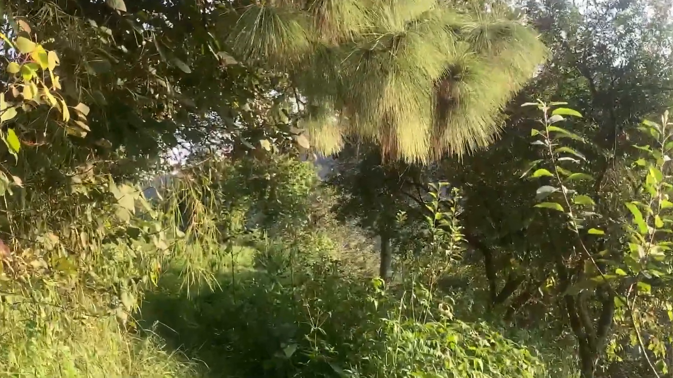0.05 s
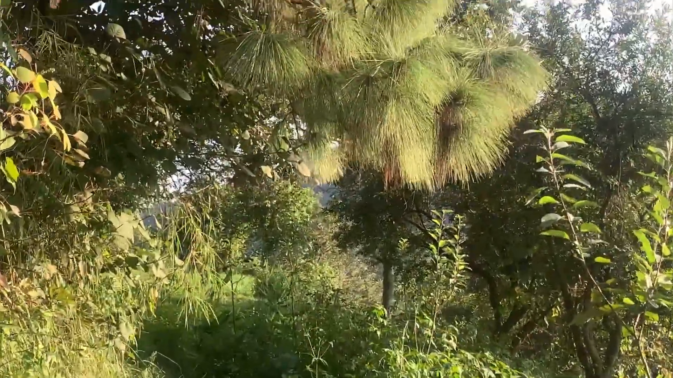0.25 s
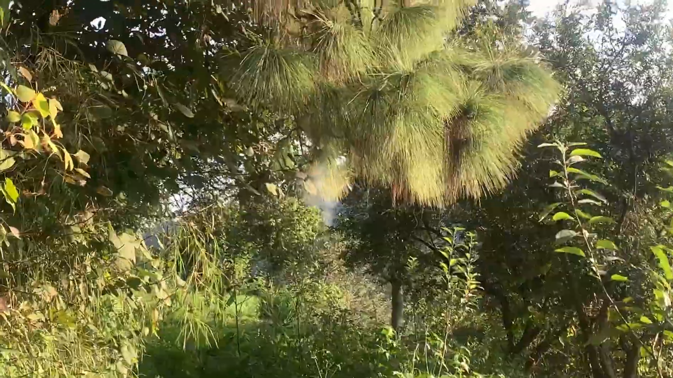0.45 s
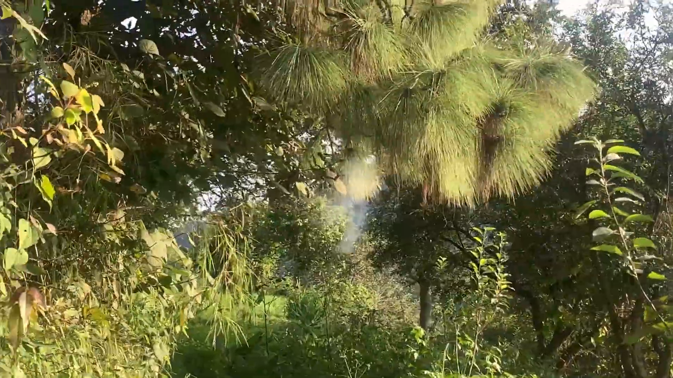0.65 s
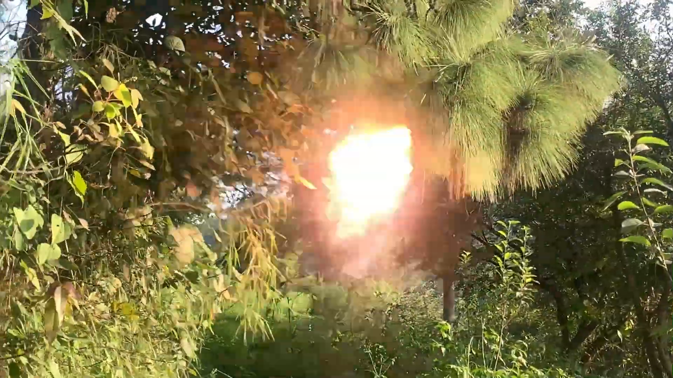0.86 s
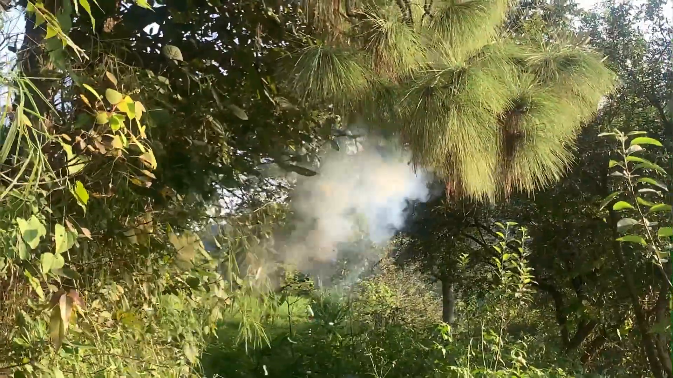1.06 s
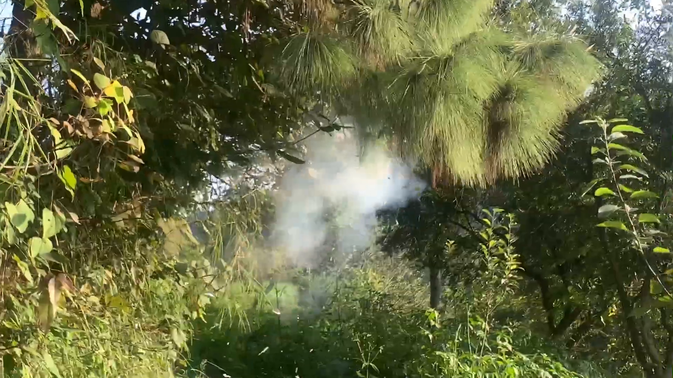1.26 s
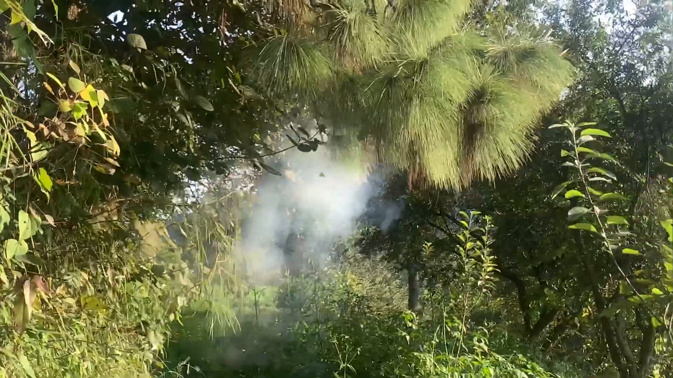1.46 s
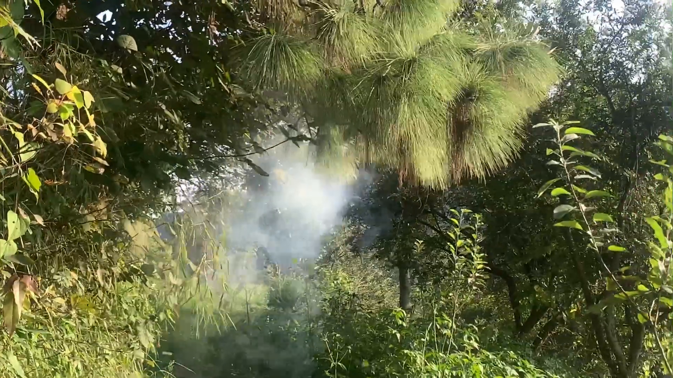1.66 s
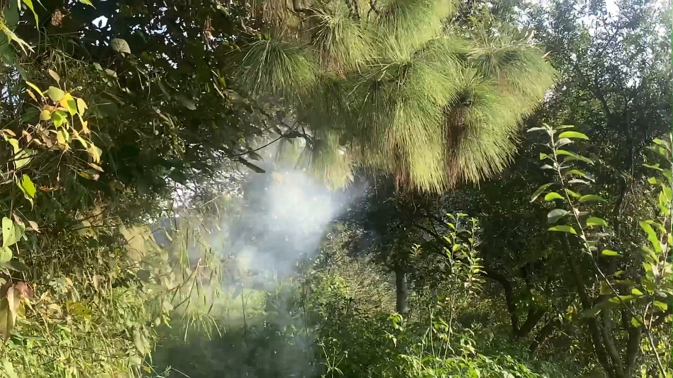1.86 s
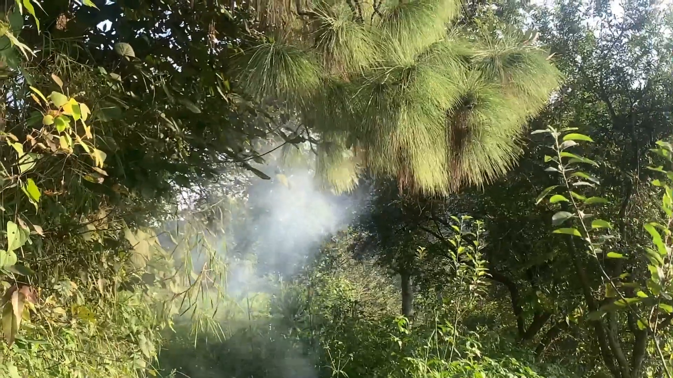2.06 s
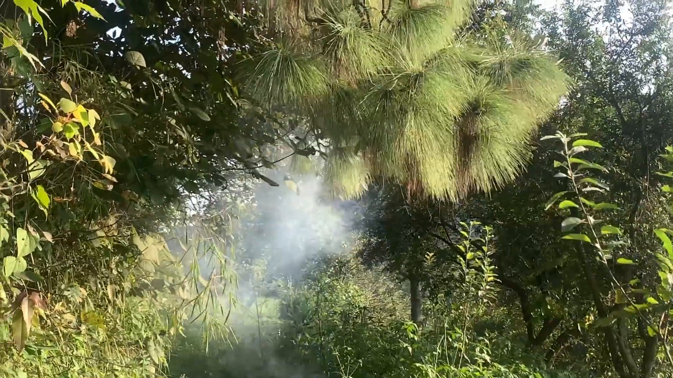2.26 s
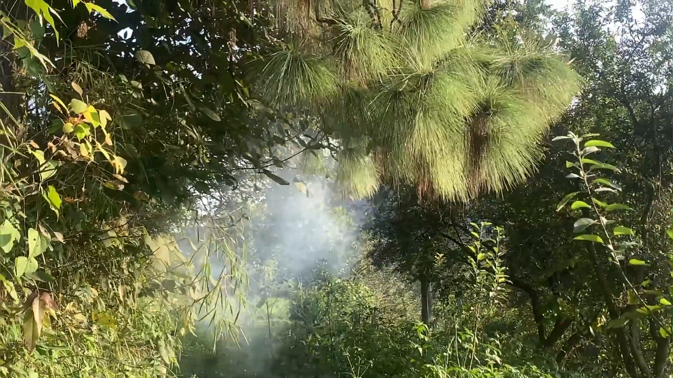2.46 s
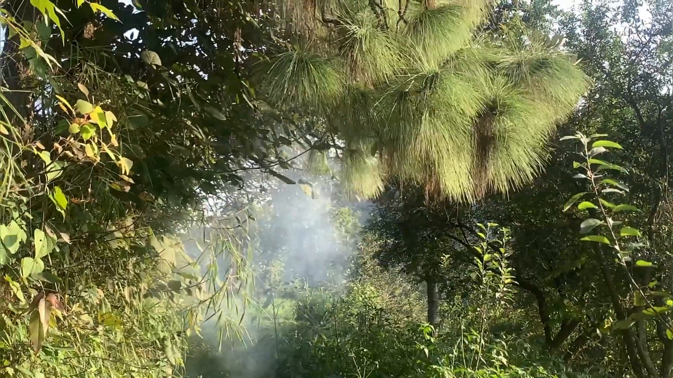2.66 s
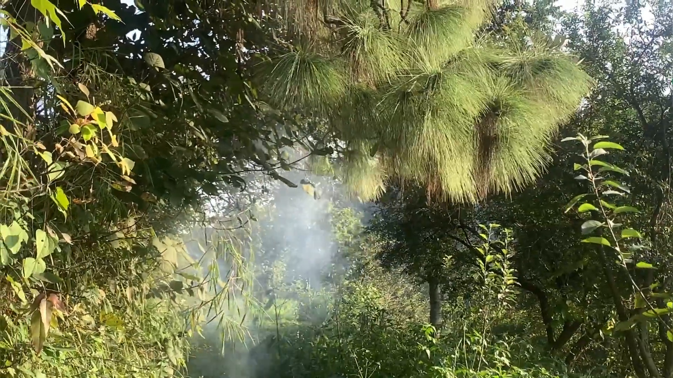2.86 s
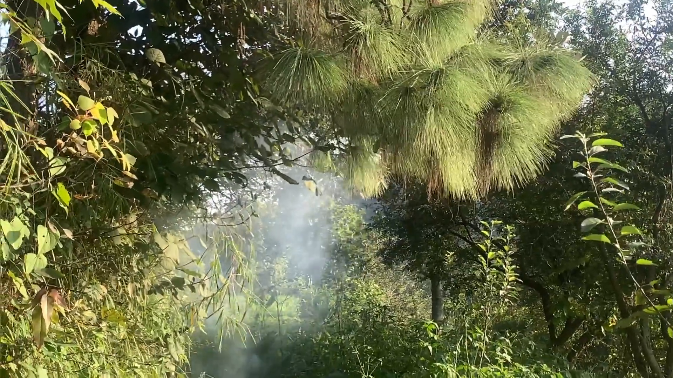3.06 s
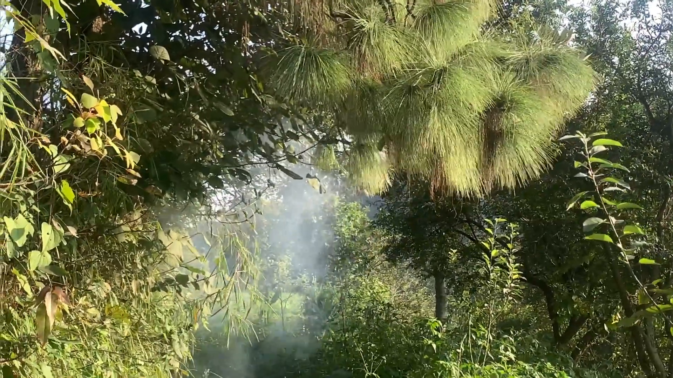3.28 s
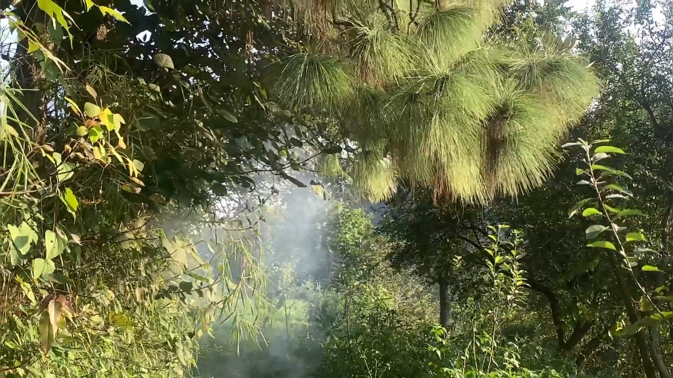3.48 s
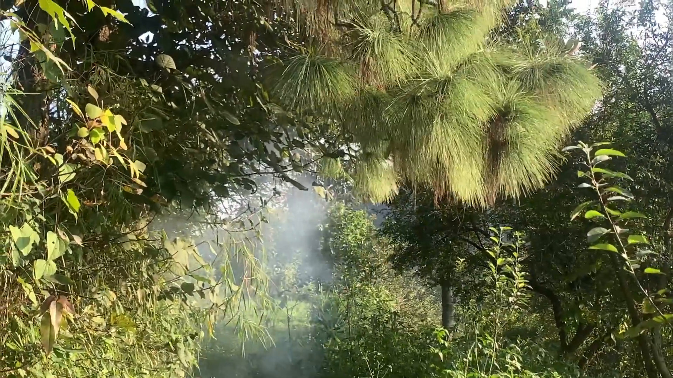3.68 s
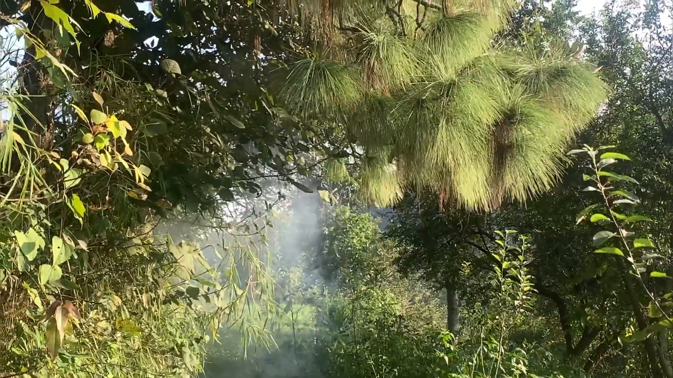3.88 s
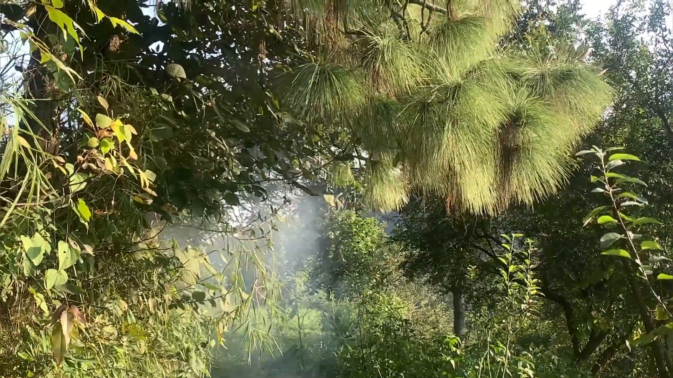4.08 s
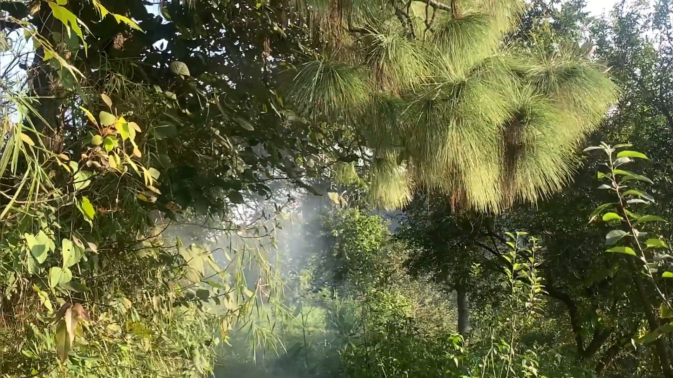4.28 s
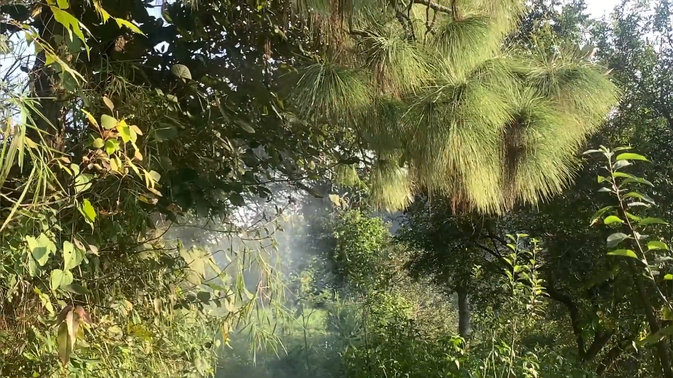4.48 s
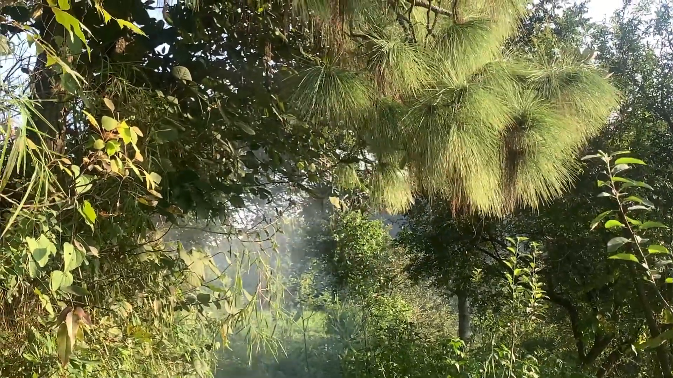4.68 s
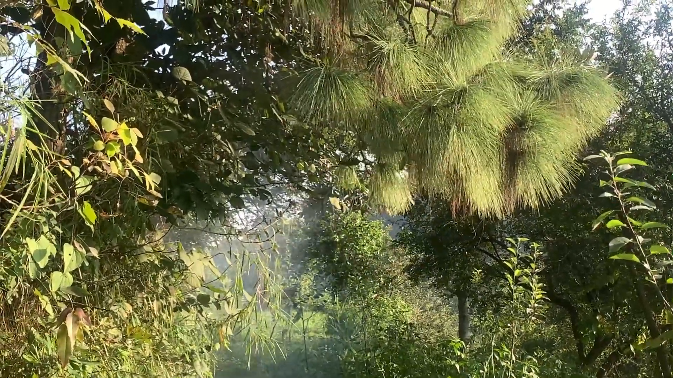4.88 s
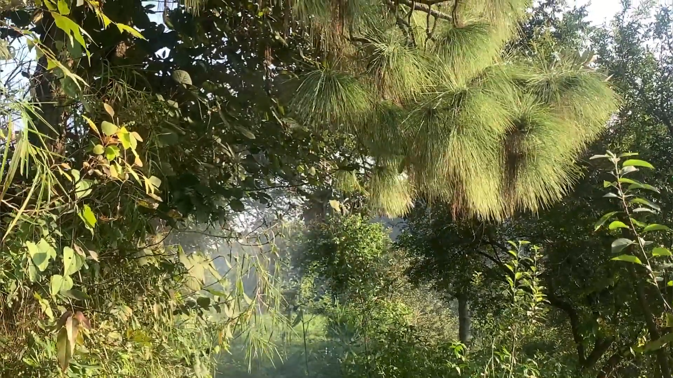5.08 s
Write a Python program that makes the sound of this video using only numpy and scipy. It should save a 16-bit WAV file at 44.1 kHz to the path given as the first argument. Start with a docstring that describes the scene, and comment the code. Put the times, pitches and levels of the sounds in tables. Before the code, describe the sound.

A fuse spits twice, then a firecracker cracks sharply in a wood, echoing off trunks and fading into a dull distant roll.

```python
"""A fuse spits twice as its powder burns, then a firecracker bursts with a sharp crack in a wood.
Trunks, leaves and ground throw the blast back for a second as thuds, hiss and rumble, and a far
hillside answers with a long dull roll. Paper scraps patter down on the leaves. Faintly behind it all,
crickets scrape out their chirps and air stirs at the microphones."""
import sys
import numpy as np
from scipy import signal
from scipy.fft import rfft, irfft, next_fast_len
from scipy.io import wavfile
from scipy.ndimage import uniform_filter1d, map_coordinates

SR = 44100
rng = np.random.default_rng(int(sys.argv[2]) if len(sys.argv) > 2 else 0)


def master_out(mix):
    """Clip the mix to full scale and print it as 16-bit PCM to the path in sys.argv[1]."""
    frames = np.transpose(np.atleast_2d(mix))
    ceiling = np.clip(frames, -1, 1)
    pcm = np.round(ceiling * 32767).astype(np.int16)
    wavfile.write(sys.argv[1], SR, pcm)


N = 226531

# how the sound from the tree trunks swells and dies: time_s, level_db
TRUNK_LEVELS = [(.93, -45), (.96, -40.5), (1.02, -52), (1.08, -45), (1.28, -42), (1.55, -49.5), (1.79, -57),
                (1.93, -58), (2.08, -67.5), (2.4, -72.5), (2.62, -68), (2.8, -76)]


def amp(db):
    """Turn decibels into a gain to multiply by."""
    return 10 ** (np.asarray(db) / 20)


def unit(x):
    """Scale a signal to an average power of one."""
    return x / np.sqrt(np.mean(x ** 2) + 1e-20)


def level_at(spectrum, hz):
    """Read a list of (pitch_hz, level_db) points at hz; silent beyond its ends."""
    pitch_hz, level_db = np.transpose(spectrum)
    return np.interp(np.log(hz + 1), np.log(pitch_hz + 1), level_db, left=-120, right=-120)


def level_curve(rows):
    """Join (time_s, level_db) points into a smooth level for every sample; silent beyond the ends."""
    time_s, level_db = np.transpose(rows)[:2]
    joined = np.interp(np.arange(N) / SR, time_s, level_db, left=-120, right=-120)
    return uniform_filter1d(joined, size=300)


def ramp(top_s, top_db, rise_db_per_s, fall_db_per_s, hold_s=0):
    """A level in dB that climbs to a top, holds and falls."""
    t = np.arange(N) / SR - top_s
    return top_db - rise_db_per_s * np.maximum(-t, 0) - fall_db_per_s * np.maximum(t - hold_s, 0)


def wobble(rate_hz):
    """A smooth curve through rate_hz random values a second."""
    coarse = np.arange(0, N + 32, 32)
    values = rng.standard_normal(int(N * rate_hz / SR) + 4)
    return np.interp(np.arange(N), coarse, map_coordinates(values, [coarse * rate_hz / SR]))


def noise(shared, lag_s, flicker_db, flicker_hz):
    """Flickering white stereo noise; the shared part reaches the right side lag_s after the left."""
    flicker = amp(flicker_db * np.array([wobble(flicker_hz) for _ in range(3)]))
    common, left, right = rng.standard_normal((3, N)) * flicker
    late = np.roll(common, round(lag_s * SR))
    return np.sqrt(shared) * np.array([common, late]) + np.sqrt(1 - shared) * np.array([left, right])


def coloured(x, spectrum, patchy_db, change_db=lambda hz, s: 0 * s):
    """Give x a tone colour with random patches; the colour may change in time, the power is kept even."""
    hz, s, slices = signal.stft(x, SR, nperseg=1024)
    gain = amp(level_at(spectrum, hz)[:, None] + change_db(hz[:, None], s))
    patches = uniform_filter1d(rng.standard_normal(gain.shape), size=4, axis=0)
    patches = uniform_filter1d(patches, size=3, axis=1)
    gain *= amp(patchy_db * unit(patches)) / np.linalg.norm(gain, axis=0)
    return unit(signal.istft(slices * gain, SR, nperseg=1024)[1][:, :N])


def band_noise(low_hz, high_hz, order, samples):
    """Stereo noise between two pitches; a higher order gives sharper edges."""
    band = signal.butter(order, [low_hz, high_hz], "bandpass", fs=SR, output="sos")
    return unit(signal.sosfilt(band, rng.standard_normal((2, samples))))


def tilted(time_s, db_per_octave, pivot_hz):
    """A colour change that tips the sound brighter or duller over time."""
    return lambda hz, s: np.interp(s, time_s, db_per_octave) * np.log2((hz + 1) / pivot_hz)


def thuds(rows, cycles):
    """A short pressure swing for each (start_s, level_db, pitch_hz), swelling for this many cycles."""
    out, t = np.zeros(N + SR), np.arange(SR // 8) / SR
    for start_s, level_db, pitch_hz in rows:
        swell = amp(level_db) * np.exp(-(t * pitch_hz / cycles - 1) ** 2)
        out[round(start_s * SR):][:len(t)] += swell * np.sin(2 * np.pi * pitch_hz * t)
    return out[:N]


def air():
    """Low puffs of air at the microphones before the burst, and the faint hiss of the place."""
    # puffs of air: peak_s, level_db
    puffs = [(0, -59.5), (.06, -68), (.11, -69), (.152, -66), (.53, -66), (.67, -64), (.8, -64), (.87, -63)]
    # colour of the puffs: pitch_hz, level_db
    puff_colour = [(12, -37), (20, -4), (44, 3), (70, -0.5), (99, -4), (162, -38.5), (400, -48.5),
                   (520, -68.5), (880, -120)]
    # colour of the hiss: pitch_hz, level_db
    hiss_colour = [(59, -31), (100, -0.5), (313, -5.5), (508, -5.5), (712, -13), (1310, -13.5),
                   (3320, -29.5), (4190, -22), (5400, -33.5), (6530, -25), (7410, -36), (10800, -30),
                   (15500, -47.5)]
    still_db, end_s = -78, .89
    swells = sum(amp(ramp(s, db, rise_db_per_s=191, fall_db_per_s=151)) for s, db in puffs)
    stir = coloured(noise(.29, -.001, 2.5, 18), puff_colour, patchy_db=1.1)
    hiss = coloured(noise(.07, 0, 1.3, 2.5), hiss_colour, patchy_db=2.1)
    return (amp(still_db) + swells) * (np.arange(N) / SR < end_s) * stir + amp(-75) * hiss


def crickets():
    """One cricket scrapes chirps of quick strokes; a lower chorus throbs further off."""
    # the high cricket's runs of chirps: start_s, length_s, level_db
    runs = [(-.01, .3, -79), (1.956, .3, -84.5), (2.412, .8, -86.5), (3.335, .1, -94), (3.572, 1.0, -84.5),
            (4.742, 0.32, -82.5)]
    # the chorus's clearest throbs: centre_s, level_db
    chorus = [(.02, -84), (.14, -81), (.27, -77), (2.19, -84), (2.45, -90.5), (2.78, -87), (2.9, -88),
              (3.06, -88), (3.17, -89), (3.39, -89.5), (3.71, -88), (3.82, -84), (3.96, -87), (4.58, -83),
              (4.72, -83.5), (4.88, -87.5), (5.02, -85)]
    chirp_s, chirp_every_s, stroke_hz, throb_half_s = .1, .223, 60, .024
    high_colour = [(6100, -18), (6400, 3), (6600, 11), (6750, -8), (6950, -28)]  # pitch_hz, level_db
    low_colour = [(3700, -21), (3950, -5.5), (4250, 2), (4400, -5.5), (4600, -24.5)]
    t = np.arange(N) / SR
    chirps = sum(amp(db) * np.sin(np.pi * np.clip((t - s) / chirp_s, 0, 1))
                 for start, length, db in runs for s in np.arange(start, start + length, chirp_every_s))
    strokes = 1 + .4 * np.cos(2 * np.pi * stroke_hz * t)
    high = coloured(noise(.71, .00015, .75, 40), high_colour, patchy_db=1.1)
    low = coloured(noise(.3, 0, 3, 45), low_colour, patchy_db=2.1)
    throbs = sum(amp(db) * np.exp(-((t - s) / throb_half_s) ** 2) for s, db in chorus)
    murmur = amp(-91.5 + 2.5 * wobble(7))
    return chirps * strokes * high + (throbs + murmur) * low


def hoots():
    """Faint hoots: narrow bands of noise swell and pass early in the far roll."""
    # the hoots: centre_s, half_length_s, pitch_hz, width_hz, level_db
    bands = [(2.93, 0.089, 1740, 140, -69.5), (2.645, 0.13, 2650, 240, -81.5), (3.28, 0.33, 2780, 560, -82)]
    t, out = np.arange(N) / SR, np.zeros((2, N))
    for centre_s, half_s, hz, width_hz, db in bands:
        swell = amp(db) * np.exp(-((t - centre_s) / half_s) ** 2)
        out += swell * band_noise(hz - width_hz / 2, hz + width_hz / 2, order=2, samples=N)
    return out


def bumps():
    """A few dull bumps before the burst."""
    # the bumps: start_s, level_db, pitch_hz
    hits = [(.155, -49, 60), (.515, -55, 166), (.8, -62, 157)]
    return thuds(hits, cycles=.67)


def scraps():
    """Paper scraps land on the leaves, each with a high patter and a lower rustle."""
    # scraps landing: start_s, patter_db, rustle_db
    landings = [(1.553, -69, -78), (1.693, -78.5, -85), (1.708, -82, -83), (1.765, -80, -84.5),
                (1.865, -82, -83.5), (1.997, -79, -75), (2.045, -79.5, -70.5), (2.169, -80.5, -71),
                (2.31, -87, -89), (2.85, -90, -90)]
    # colour of the patter: pitch_hz, level_db
    patter_colour = [(6500, -25), (7600, -0.5), (8500, 8.5), (10200, -6), (11500, -28)]
    # colour of the rustle: pitch_hz, level_db
    rustle_colour = [(1200, -18), (1800, 10), (4000, -9), (6500, -5), (7500, -22)]
    rise_s, fade_s = .011, .28  # a fade is the time to drop 60 dB
    patter = coloured(noise(.2, 0, 3, 270), patter_colour, patchy_db=2.5)
    rustle = coloured(noise(.23, 0, 2.7, 250), rustle_colour, patchy_db=3)
    out = np.zeros((2, N))
    for start_s, patter_db, rustle_db in landings:
        t = np.maximum(np.arange(N) / SR - start_s, 0)
        shape = np.minimum(t / rise_s, 1) * amp(-60 * t / fade_s)
        out += shape * (amp(patter_db) * patter + amp(rustle_db) * rustle)
    return out


def hillside():
    """The far slope rolls the blast back, dull and lumpy, over a heaving ground rumble."""
    # colour of the roll: pitch_hz, level_db
    roll_colour = [(59, -48), (100, -18.5), (234, -21.5), (325, -1), (636, 0), (786, -5), (1220, -10),
                   (1370, -12.5), (3600, -40), (4180, -44), (5000, -77), (6500, -80), (11000, -120)]
    # how that colour drifts: time_s, tilt_db_per_octave, shift_octaves
    drift = [(2.2, -3.5, -0.4), (2.7, 5.5, -0.13), (3.3, -0.5, 0.27), (3.8, 0.95, -0.0018),
             (4.4, 0.5, -0.079), (5.14, -1, -0.48)]
    # colour of the ground rumble: pitch_hz, level_db
    ground_colour = [(13, -44), (22, -11), (54, -1), (172, -4), (203, -5.5), (280, -2), (360, -30),
                     (620, -120)]

    def sliding(hz, s):
        """The colour tilts and rises, then slides down as later sound comes from further off."""
        time_s, tilt, octaves = np.transpose(drift)
        shifted_db = level_at(roll_colour, hz / 2 ** np.interp(s, time_s, octaves))
        return tilted(time_s, tilt, pivot_hz=600)(hz, s) + shifted_db - level_at(roll_colour, hz)

    arrival_s, fade_in_s = 2.205, .14
    arrived = np.clip((np.arange(N) / SR - arrival_s) / fade_in_s, 0, 1)
    roll_db = ramp(top_s=3.374, top_db=-57.5, rise_db_per_s=12.5, fall_db_per_s=9, hold_s=.7)
    ground_db = ramp(top_s=2.6, top_db=-71.5, rise_db_per_s=25, fall_db_per_s=4) + 3.5 * wobble(9)
    roll = coloured(noise(.19, -.0003, 1.25, 50), roll_colour, patchy_db=1.64, change_db=sliding)
    ground = coloured(noise(.3, .0028, 2.1, 14), ground_colour, patchy_db=1.8)
    return arrived * (amp(roll_db) * roll + amp(ground_db) * ground)


def echoes():
    """Single trunks and rocks slap back: near ones reach the left side first, far ones the right."""
    # strong echoes: start_s, level_db, pitch_hz
    slaps = [(1.048, -36.5, 524), (1.12, -33.5, 453), (1.274, -32, 504), (1.291, -33.5, 332),
             (1.314, -33.5, 427), (1.339, -37.5, 444), (1.399, -34.5, 424), (1.429, -34.5, 356),
             (1.471, -36.5, 430), (1.554, -39.5, 521), (1.572, -39, 344), (1.652, -37.5, 534),
             (1.728, -46.5, 449), (2.163, -56, 500), (2.289, -55, 500), (2.555, -59, 360),
             (2.705, -58, 300), (3.488, -52, 594), (3.528, -52, 460), (3.674, -49, 483), (3.93, -48, 570),
             (4.1, -50, 471), (4.575, -49, 626)]
    when, weakness, pitch = rng.random((12, 3)).T  # twelve lesser echoes fall at random
    stray_s = 1.05 + 1.45 * when
    stray_db = np.interp(stray_s, *np.transpose(TRUNK_LEVELS)) + 5.5 - 5 * weakness
    stray_hz = 460 * 1.6 ** (pitch - .5)
    start_s, db, hz = np.vstack([slaps, np.transpose([stray_s, stray_db, stray_hz])]).T
    near = start_s < 2.5
    lag_s = np.where(near, .0022, -.0003)
    left_over_right_db = np.where(near, -3.5, .5)
    left = thuds(zip(start_s, db + left_over_right_db / 2, hz), cycles=.98)
    right = thuds(zip(start_s + lag_s, db - left_over_right_db / 2, hz), cycles=1.23)
    return np.array([left, right])


def wood():
    """Trunks return thuds, leaves a hiss that loses its treble in the air, the ground a rumble."""
    # colour of the sound off the trunks: pitch_hz, level_db
    trunk_colour = [(82, -46.5), (140, -16), (235, -8.5), (340, -3), (377, -6), (454, -4), (664, -6.5),
                    (875, -6), (948, -8.5), (1440, -21), (2200, -23), (2860, -53.5), (4840, -120)]
    # colour of the sound off the leaves: pitch_hz, level_db
    leaf_colour = [(710, -31), (1200, 0.5), (2040, -9), (2910, -9), (6450, -16), (7630, -20.5),
                   (8340, -17.5), (10800, -28), (12600, -38), (16400, -68), (22000, -120)]
    # colour of the sound off the ground: pitch_hz, level_db
    rumble_colour = [(12, -35), (20, -4), (49, 3), (92, -2), (162, -15), (200, -13.5), (260, -41),
                     (440, -120)]
    absorbed = lambda hz, s: -22 * (hz / 8000) ** 2.5 * np.clip(s - 1.05, 0, 1.2)
    trunks = coloured(noise(.55, .0022, 3.4, 60), trunk_colour, patchy_db=1.8) * amp([[-1.5], [1.5]])
    leaves = coloured(noise(.04, 0, .74, 73), leaf_colour, patchy_db=2.6, change_db=absorbed)
    rumble = coloured(noise(.3, .00098, .88, 10), rumble_colour, patchy_db=2.1) * amp([[1.2], [-1.2]])
    trunks_db = level_curve(TRUNK_LEVELS)
    swell_db = trunks_db - trunks_db.max()  # leaves and ground swell along with the trunks
    t = np.arange(N) / SR - .93  # time since the closest echoes arrived
    closest = lambda db, fade_s: amp(db - 60 * np.abs(t) / fade_s) * (t > 0)
    leaf_gain = np.hypot(closest(db=-39, fade_s=.81), amp(-45.5 + 1.203 * swell_db))
    rumble_gain = np.hypot(closest(db=-21.5, fade_s=.083), amp(-49.5 + 1.5 * swell_db))
    return amp(trunks_db) * trunks + leaf_gain * leaves + rumble_gain * rumble


def fuse():
    """Burning powder hisses out in a spurt, then flares with a brighter sizzle."""
    # how the fuse burns: time_s, level_db, tilt_db_per_octave
    burn = [(0, -79, -0.5), (.275, -79, -0.5), (0.302, -59.5, -1), (0.378, -52, -0.5), (0.424, -63.5, -4),
            (0.482, -72, -1), (0.656, -62.5, 2), (0.718, -50.5, 0.5), (0.9, -55.5, -1.5)]
    # colour of the first spurt: pitch_hz, level_db
    spurt_colour = [(180, -58), (300, -22), (423, -7.5), (595, -8), (729, -34), (825, -9), (1800, -3.5),
                    (2010, -7), (2380, -5), (2780, -8), (8530, -11), (12400, -31), (16100, -64),
                    (22000, -120)]
    # colour of the last flare: pitch_hz, level_db
    flare_colour = [(180, -56), (300, -26), (443, -8.5), (764, -21.5), (965, -2), (1140, -11), (1280, -2.5),
                    (2010, -7.5), (2200, -5.5), (2570, -13), (3350, -5), (7300, -7), (8800, -3.5),
                    (12400, -15), (16100, -43), (22000, -120)]
    time_s, _, tilt = np.transpose(burn)
    brightness = tilted(time_s, tilt, pivot_hz=4000)
    spurt, flare = (coloured(noise(.5, 0, 1.2, 200), colour, patchy_db=2.13, change_db=brightness)
                    for colour in (spurt_colour, flare_colour))
    spurt_s = .36  # the spurt's colour holds only around this moment
    flare_share = np.clip(np.abs(np.arange(N) / SR - spurt_s) / .043 - 1.2, 0, 1)
    return amp(level_curve(burn)) * (np.sqrt(1 - flare_share) * spurt + np.sqrt(flare_share) * flare)


def blast():
    """A sharp crack and low thump in bands of noise. A brief swell of noise is heard just ahead."""
    # pressure swings, timed from the burst: left_s, right_s, pitch_hz, half_length_s, left_db, right_db
    swings = [(.0001, -.0002, 2989, .0003, -7, -15), (.0001, -.0002, 7092, .00015, -9.5, -18.5),
              (.0001, -.0002, 12850, .0001, -6.5, -10), (.001, -.002, 850, .0012, -6.5, -12.5),
              (.0031, .0049, 410, 0.0023, -6, -11.5), (.0076, .012, 215, .0032, -11, -19),
              (.0085, .013, 80, .006, -8, -17), (0.025, .055, 44.77, .014, -26.5, -28.5)]
    # noise bands, timed from the burst: peak_s, rise_s, fade_s, low_hz, high_hz, left_db, right_db
    bands = [(-.012, .008, .03, 332, 440, -14, -24.5), (-.004, .004, 0.009, 595, 680, -11.5, -18),
             (-.012, 0.0092, .03, 5000, 5400, -33, -28), (-.012, .01, 0.025, 830, 5400, -34, -23),
             (-.003, .003, 0.027, 3660, 5600, -28, -10), (-.003, .003, .02, 5643, 8000, -24, -14.5),
             (-.003, .004, .03, 2000, 3600, -28, -17.5), (-.002, 0.0056, 0.023, 700, 2400, -26, -14.5),
             (.006, .003, .1, 150, 1500, -21.5, -23), (.006, .003, 0.18, 1500, 9300, -28, -27.5),
             (.003, .002, .15, 9000, 12600, -44, -42), (.003, .002, .12, 12500, 15700, -38.5, -38)]
    burst_s = .9073
    t = np.arange(round(.5 * SR)) / SR - .05
    out = np.zeros((2, len(t)))
    for left_s, right_s, hz, half_s, left_db, right_db in swings:
        offset_s = t - np.array([[left_s], [right_s]])
        shape = np.exp(-(offset_s / half_s) ** 2)
        out += amp([[left_db], [right_db]]) * shape * np.sin(2 * np.pi * hz * offset_s)
    for peak_s, rise_s, fade_s, low_hz, high_hz, left_db, right_db in bands:
        rising = np.exp(-((t - peak_s) / rise_s) ** 2 / 2)
        fading = amp(-60 * np.abs(t - peak_s) / fade_s)
        band = band_noise(low_hz, high_hz, order=7, samples=len(t))
        out += amp([[left_db], [right_db]]) * np.where(t < peak_s, rising, fading) * band
    start = round((burst_s + t[0]) * SR)
    return np.pad(out, ((0, 0), (start, N - start - len(t))))


def scene():
    """The firecracker, its echoes and the quiet sounds around it, added up in stereo."""
    foreground = fuse() + blast() + wood() + echoes() + hillside()
    return foreground + hoots() + air() + crickets() + scraps() + bumps()


def record(dry):
    """The two microphones differ in colour; the recorder rounds off loud peaks and cuts the top treble."""
    # colour of the microphone openings: pitch_hz, both_db, left_over_right_db
    mic_colour = [(200, 1, -1), (690, 1, -0.5), (1298.2, 0, 2), (2394, 0, 0), (4405, 0.5, 0), (7860, 0, -2),
                  (8340, 0, -3.5), (9400, -1.5, -2), (12203, 0.5, 0), (12800, -13.5, -1)]
    ceiling, top_hz = .99, 15900
    size = next_fast_len(N + 8192)
    hz = np.fft.rfftfreq(size, 1 / SR)
    pitch_hz, both_db, lean_db = np.transpose(mic_colour)
    mic_db = [np.interp(np.log(hz + 1), np.log(pitch_hz), both_db + side * lean_db / 2)
              for side in (1, -1)]
    heard = irfft(rfft(dry, size) * amp(mic_db), size)
    rounded = heard / (1 + np.abs(heard / ceiling) ** 4) ** (1 / 4)
    return irfft(rfft(rounded, size) * (hz < top_hz), size)[:, :N]


dry = scene()
out = record(dry)
master_out(out)
```